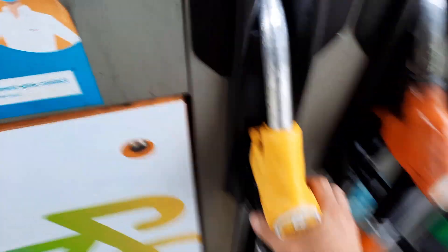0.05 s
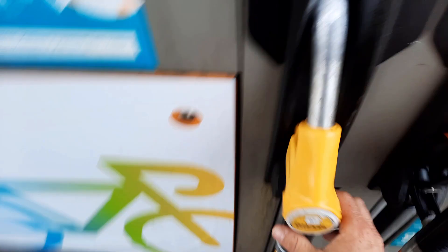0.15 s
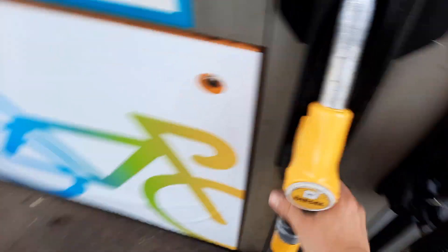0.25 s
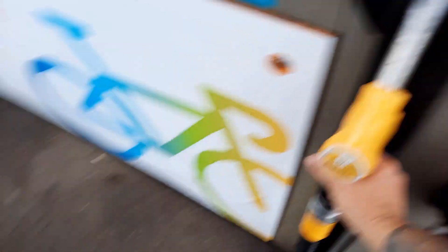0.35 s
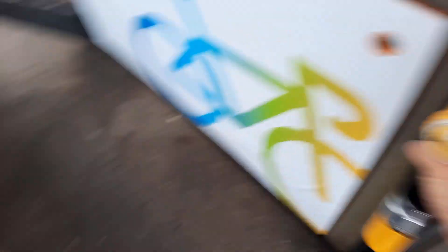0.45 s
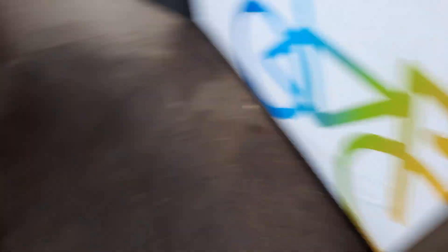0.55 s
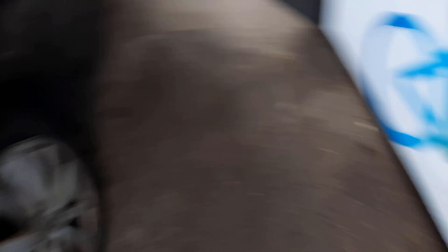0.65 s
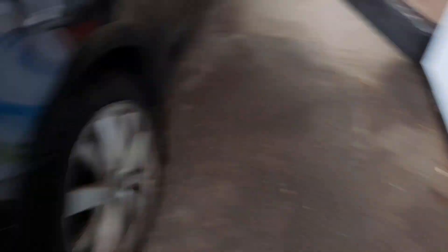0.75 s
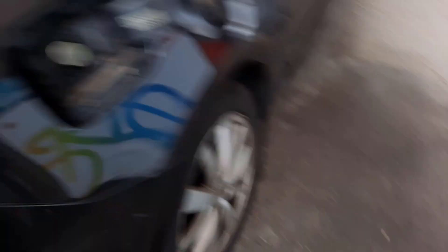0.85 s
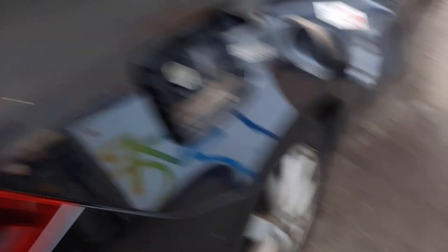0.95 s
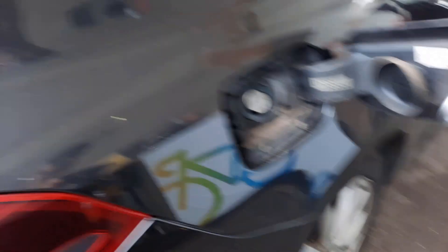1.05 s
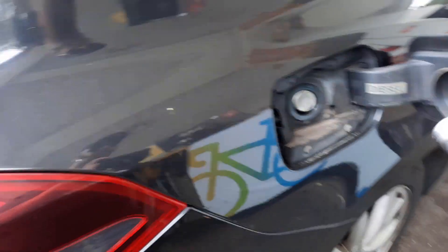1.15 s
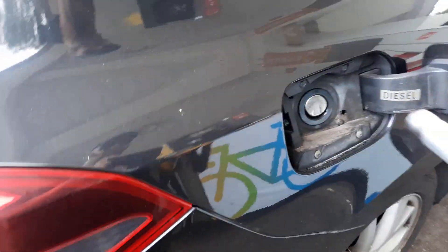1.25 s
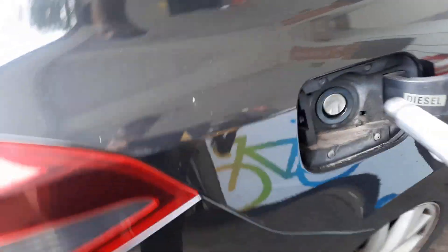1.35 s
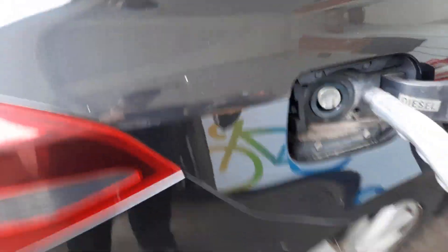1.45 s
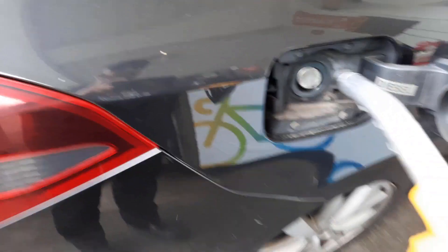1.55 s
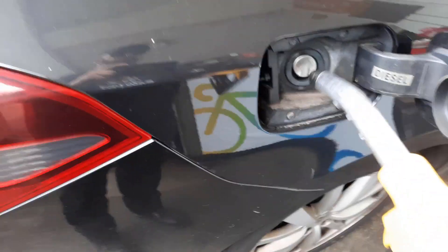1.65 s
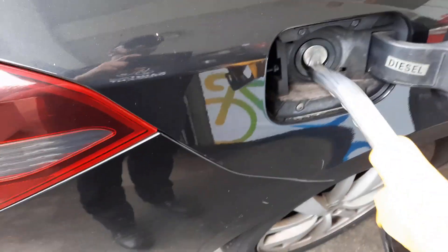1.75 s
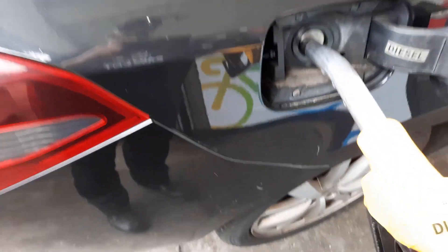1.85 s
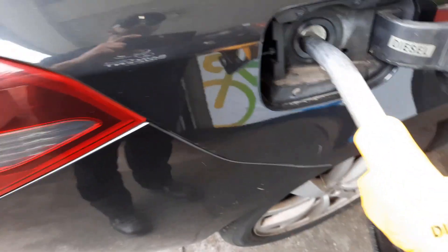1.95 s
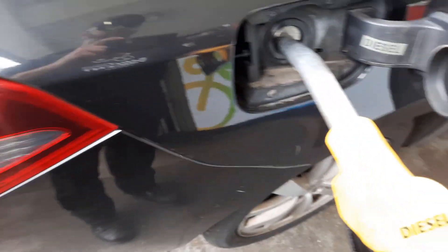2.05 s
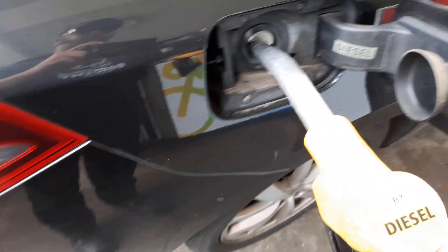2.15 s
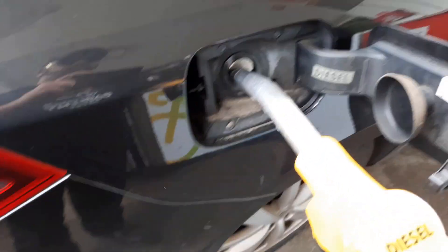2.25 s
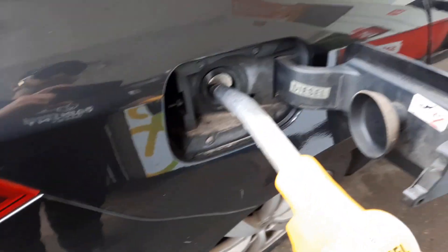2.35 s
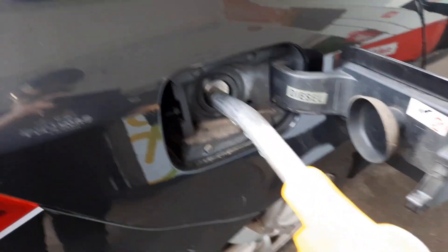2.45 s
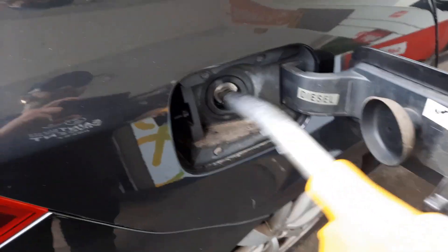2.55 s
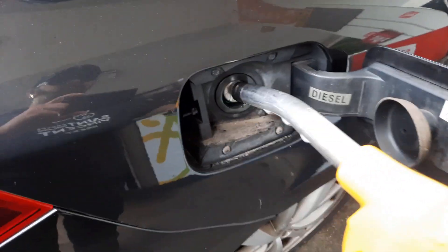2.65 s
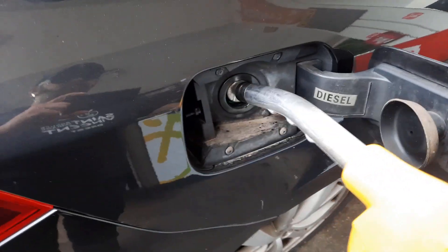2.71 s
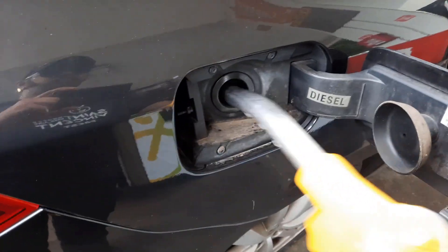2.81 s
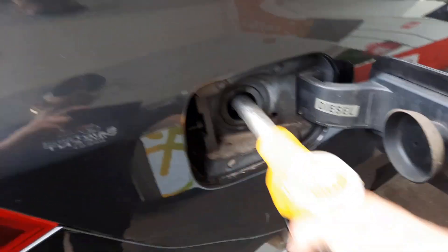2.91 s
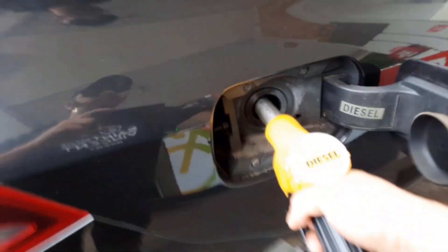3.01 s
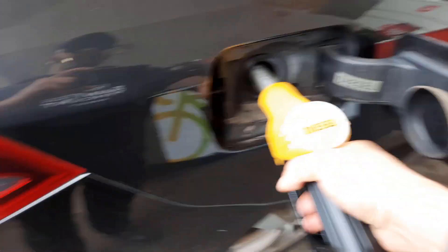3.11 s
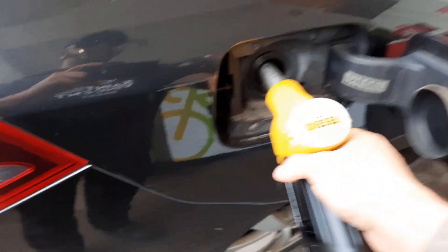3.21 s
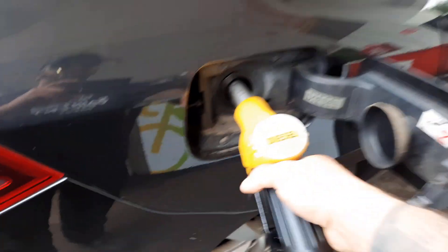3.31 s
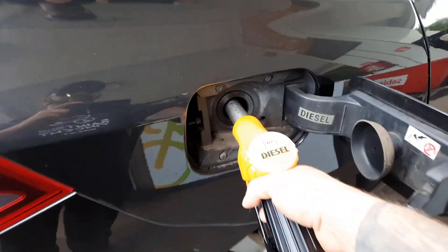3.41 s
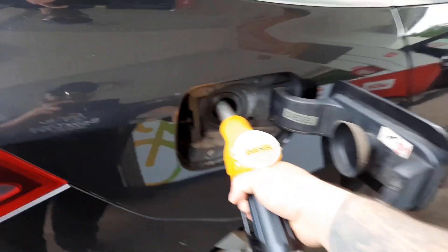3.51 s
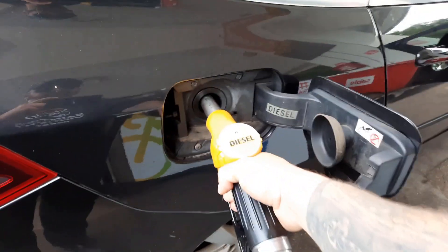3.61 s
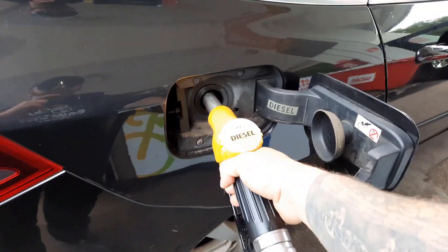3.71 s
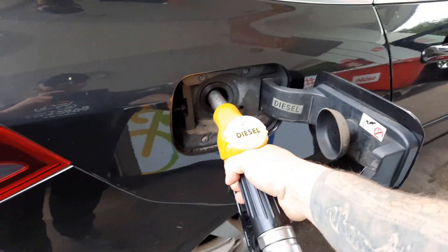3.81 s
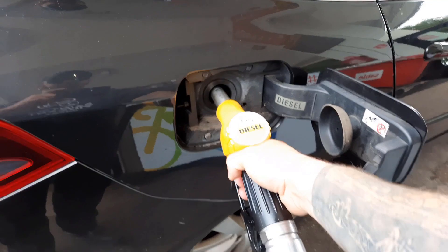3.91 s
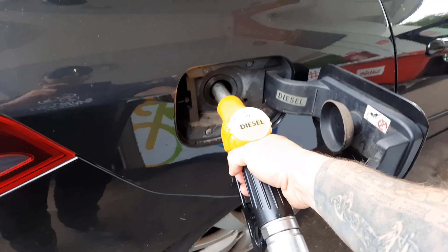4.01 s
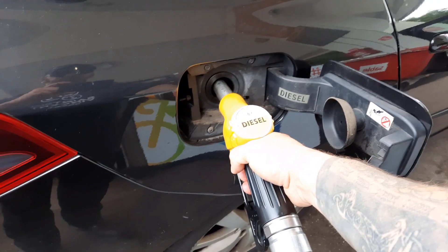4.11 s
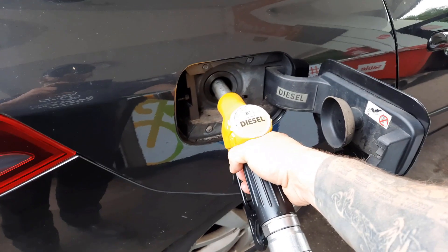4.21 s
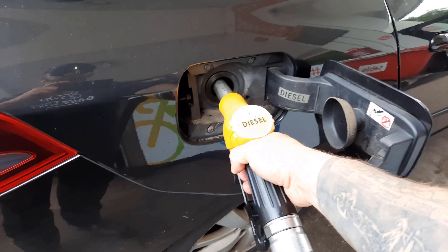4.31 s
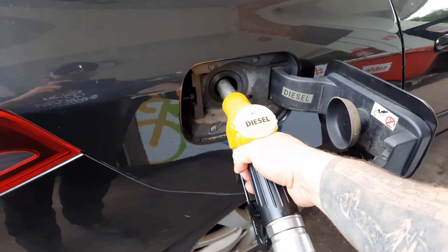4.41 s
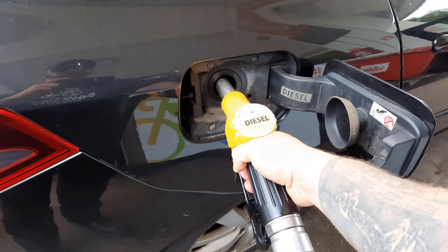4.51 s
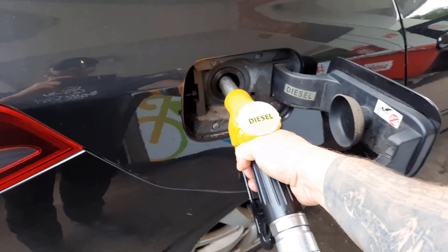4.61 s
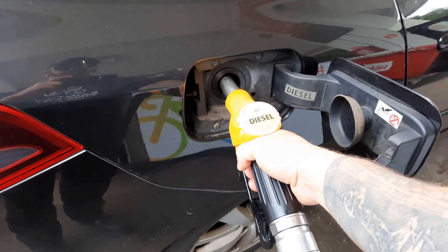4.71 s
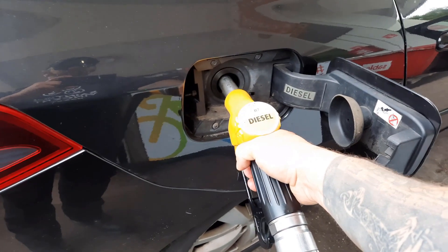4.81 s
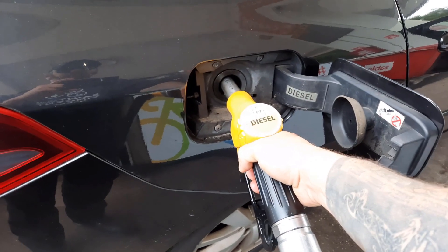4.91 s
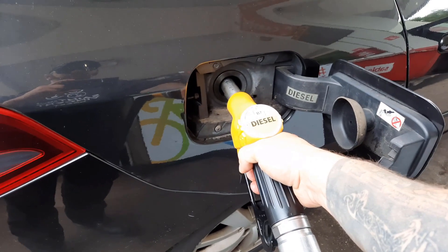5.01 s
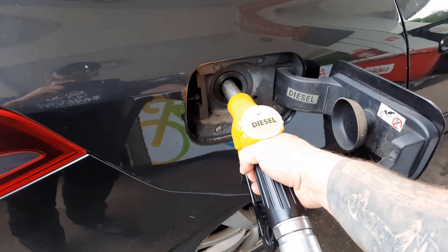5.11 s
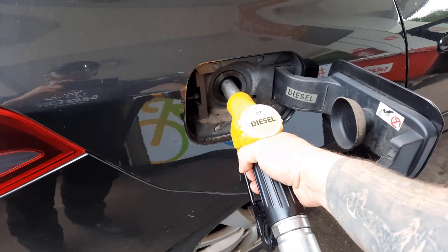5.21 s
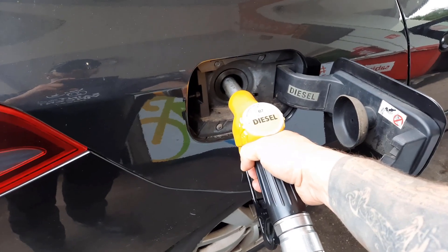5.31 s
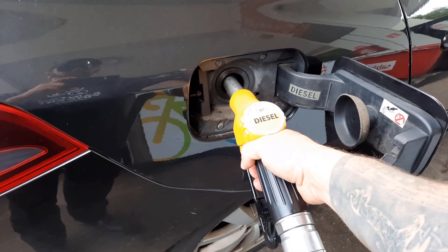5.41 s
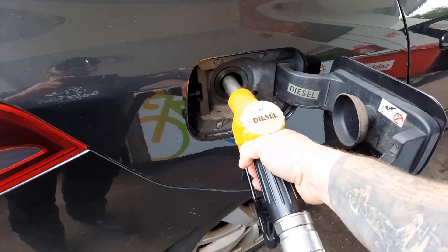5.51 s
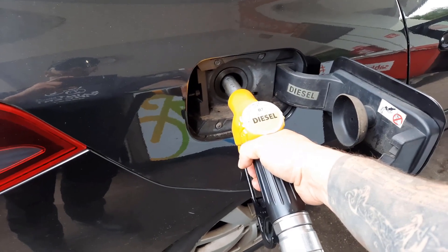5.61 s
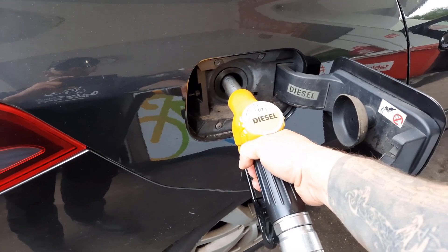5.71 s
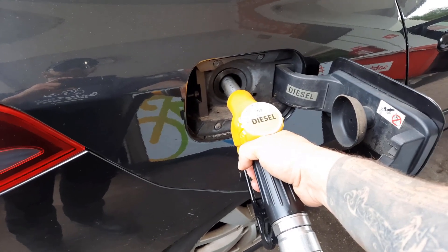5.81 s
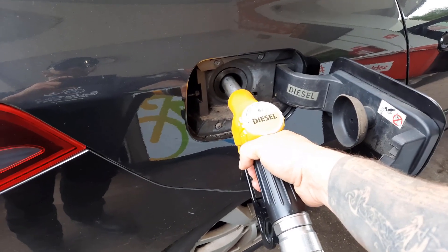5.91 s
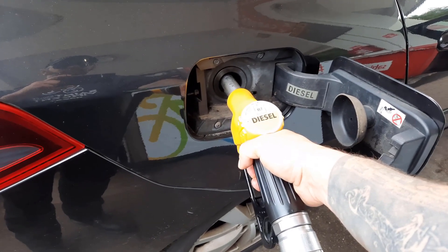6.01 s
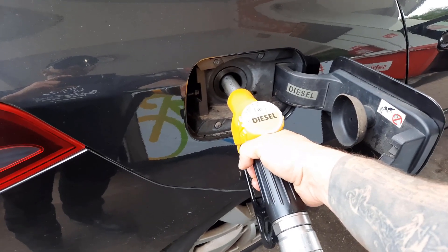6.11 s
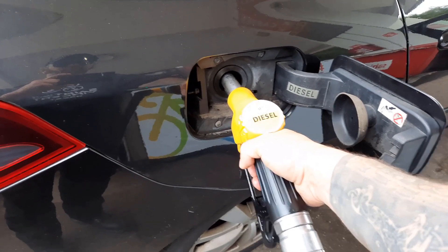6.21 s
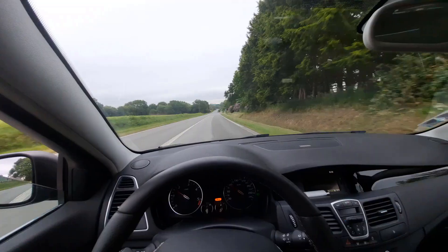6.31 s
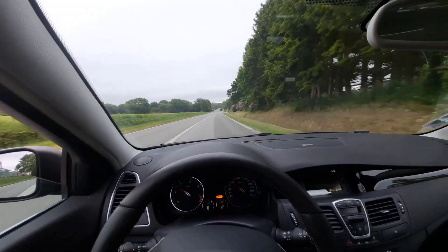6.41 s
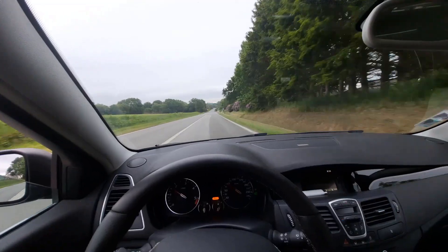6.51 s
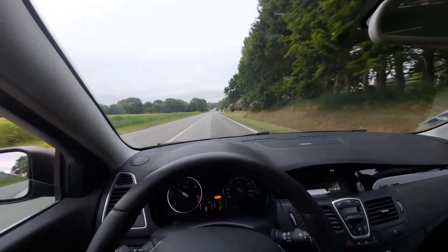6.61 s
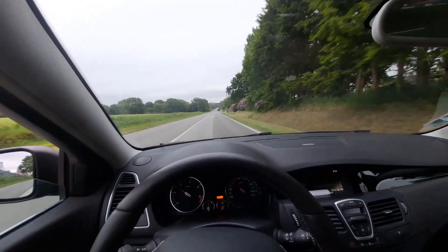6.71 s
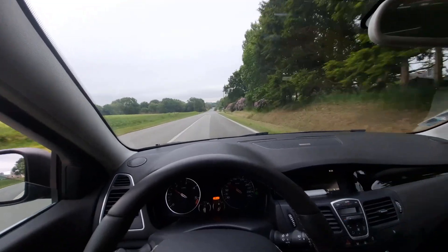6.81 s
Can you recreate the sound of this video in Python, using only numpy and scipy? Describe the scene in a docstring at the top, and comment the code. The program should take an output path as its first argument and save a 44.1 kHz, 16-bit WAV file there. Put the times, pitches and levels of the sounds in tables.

```python
"""Fuel nozzle on a forecourt, then a driving car

A fuel nozzle is knocked out of its holster, scraped into a filler neck and its trigger clicks: blows ring modes.
Fuel swells and gurgles, made of noise and rising bubbles, under a sagging pump whine, a wavering sine.
Birds, gliding sines, sing over the forecourt's noise. After a cut: the noise rumble inside a driving car.
A hand-held camera with two spaced microphones hears it all."""
import sys
import numpy as np
from scipy import signal
from scipy.fft import rfft, irfft, next_fast_len
from scipy.io import wavfile
from scipy.ndimage import uniform_filter1d

SR = 44100
rng = np.random.default_rng(int(sys.argv[2]) if len(sys.argv) > 2 else 0)


def boost_factor(decibels):
    """Convert a level in decibels to a linear amplitude factor."""
    exponent = np.asarray(decibels, float) / 20
    return 10 ** exponent


def generate_wav(sig):
    """Save sig (samples, or channels by samples) to the path in sys.argv[1] as 16-bit PCM at SR."""
    pcm = np.round(np.clip(np.atleast_2d(sig).T, -1, 1) * 32767).astype(np.int16)
    wavfile.write(sys.argv[1], SR, pcm)


N = 302217

# The trigger's click. Each row: start in seconds, tick in dB near 2200 Hz, body in dB,
# lower ring over upper ring in dB, treble in dB near 6000 Hz; all before the gains of blows().
TRIGGER_BLOWS = [(3.9584, -26.5, -41, 48, -17.5)]


def level(x, db):
    """Set the rms."""
    return x * boost_factor(db) / np.sqrt(np.mean(x ** 2))


def curves(table):
    """Columns of a table at every sample, joined by straight lines."""
    s, *columns = np.transpose(table)
    return [np.interp(np.arange(N) / SR, s, c) for c in columns]


def at_hz(hz, points):
    """Read (Hz, value) points on a log axis."""
    f, v = np.transpose(points)
    return np.interp(np.log(np.maximum(hz, 1)), np.log(f), v)


def walk(rate, size):
    """Random levels held 1 / rate s and slewed twice."""
    hold = int(SR / rate)
    steps = np.repeat(rng.standard_normal(size // hold + 1), hold)
    return 0.787 * uniform_filter1d(uniform_filter1d(steps, hold), hold)[:size]


def bumps(times, gains, rise_s, fall_s):
    """Swells that rise exponentially to their moment and die away."""
    late_s = np.arange(N)[None] / SR - np.array(times)[:, None]
    return np.array(gains) @ np.exp(np.where(late_s < 0, late_s / rise_s, -late_s / fall_s))


def wash(points, flicker_db, rate, wide, size=N):
    """Coloured noise whose octaves flicker alone; alike on both sides in the bass, less so in the treble."""
    n = next_fast_len(size)
    hz = np.arange(n // 2 + 1) * SR / n
    mid, side = rfft(rng.standard_normal((2, n))) * boost_factor(at_hz(hz, points))
    side = side * np.clip(wide * np.minimum(hz / 800, 1), 0, 1)
    pair = np.array([mid + side, mid - side])
    out = 0
    for octave in range(5, 15):
        share = np.maximum(1 - np.abs(np.log2(np.clip(hz, 32, 2 ** 14)) - octave), 0)
        band = irfft(pair * share, n)[:, :size]
        out = out + band * boost_factor(flicker_db * walk(rate, size))
    return level(out, 0)


def tone(hz, db, rough_db, rate):
    """A sine that wavers in level and pitch."""
    hz = hz * (1 + .003 * walk(rate, len(hz)))
    sine = np.sqrt(2) * np.sin(2 * np.pi * np.cumsum(hz) / SR)
    return sine * boost_factor(db + rough_db * walk(rate, len(hz)))


def ring(x, hz, t60):
    """One mode, a two-pole resonator; the grip of hand and rubber cuts each ring short, to at most 70 cycles
    plus 0.03 s."""
    t60 = np.clip(t60, .003, 70 / hz + .03)
    r, w = np.exp(-np.log(1000) / (t60 * SR)), 2 * np.pi * hz / SR
    return signal.lfilter([0, r * np.sin(w)], [1, -2 * r * np.cos(w), r * r], x)


def echoes(x, t60, db, top_hz):
    """Scattered, dulled returns from pumps, cars and canopy, different on each side."""
    t = np.arange(SR // 2) / SR
    tail = rng.standard_normal((2, len(t))) * np.exp(-np.log(1000) * t / t60)
    tail = signal.sosfilt(signal.butter(1, top_hz, fs=SR, output="sos"), tail)
    tail = tail / np.sqrt(np.sum(tail ** 2) / 2)
    return x + boost_factor(db) * signal.fftconvolve(x[None], tail, axes=1)[:, :N]


def blows(table, modes, thud_db, contact_s, ring_db, crack_db, crack_s):
    """Each blow: a short rough contact rings the modes, and a crack of noise dies fast, both in the blow's colour."""
    # The five frequencies in Hz at which a blow's colour is set.
    blow_hz = (200, 550, 850, 2200, 6000)
    out = np.zeros(N + SR)
    t = np.arange(SR // 4) / SR
    hz = np.arange(len(t) // 2 + 1) * SR / len(t)
    for s, tick, body_db, lean, treble in table:
        # thud_db lifts the thud near 200 Hz over the body; lean favours the lower or the upper ring
        colour_db = (body_db + thud_db, body_db + min(lean, 0), body_db - max(lean, 0), tick, treble)
        colour = list(zip(blow_hz, colour_db))
        noise = rng.standard_normal((2, len(t)))
        spread = rng.standard_normal((2, len(modes)))
        push = (1 + .5 * noise[0]) * np.exp(-t / contact_s) + 0.058 * noise[0] * np.exp(-t / 0.0072)
        push = level(push, 0) / np.sqrt(len(t))
        body = 0
        for (f, g, t60), detune, uneven in zip(modes, *spread):
            r = ring(push, f * (1 + 0.018 * detune), t60)
            # a longer push feeds low modes more, so each is scaled to its own peak
            body = body + boost_factor(g + 0.5 * uneven + at_hz(f, colour)) * r / np.abs(r).max()
        tilt = np.sqrt(1000 / np.maximum(hz, 300)) / (1 + (hz / 13000) ** 4) * np.minimum(hz / 250, 1) ** 2
        crack = irfft(rfft(noise[1]) * boost_factor(at_hz(hz, colour)) * tilt, len(t))
        crack = crack * (np.exp(-t / crack_s) + .1 * np.exp(-t / .012))
        i = int(s * SR)
        out[i:i + len(t)] += boost_factor(ring_db) * body + boost_factor(crack_db) * crack
    # small parts radiate no deep bass
    return signal.sosfilt(signal.butter(3, 90, "high", fs=SR, output="sos"), out[:N])


def late(lag_s):
    """Phase line of a left side that hears later."""
    return [(0, 0), (SR / 2, -np.pi * SR * lag_s)]


def heard(x, lead, balance):
    """The two microphones: own colour each, and a phase step between them."""
    n = next_fast_len(N)
    hz = np.arange(n // 2 + 1) * SR / n
    half_db = at_hz(hz, balance) / 2
    phase = np.interp(hz, *np.transpose(lead))
    ports = np.array([boost_factor(half_db) * np.exp(1j * phase), boost_factor(-half_db)])
    return irfft(rfft(x * np.ones((2, 1)), n) * ports, n)[:, :N]


def microphone_hiss():
    """Steady treble-heavy noise of the microphones."""
    # Each row: frequency in Hz, relative level in dB per Hz.
    hiss_colour = [(3000, -15), (8000, 6), (16000, -2)]
    return boost_factor(-87) * wash(hiss_colour, 1.5, 20, 1)


def forecourt():
    """Distant traffic: a wide noise bed that slowly swells and sinks."""
    # Each row: frequency in Hz, relative level in dB per Hz.
    town_colour = [(18, -54), (30, -35), (86, -10), (194, -13), (311, 2), (437, -10), (499, -9),
                   (616, -17.5), (666, -15), (1910, -22.5), (2290, -17), (2900, -47), (5040, -34.5),
                   (8980, -54), (16000, -79)]
    # Each row: time in seconds, level in dB.
    traffic = [(0, -41.5), (.9, -45), (1.3, -46.5), (1.75, -45.5), (2.1, -42.5), (2.6, -40), (3.3, -42),
               (3.8, -41), (4.5, -42)]
    return wash(town_colour, 3, 21, .95) * boost_factor(curves(traffic)[0])


def cabin():
    """Body boom and tyre roar inside the car, noise below and above 300 Hz, each on its own swell."""
    # Each row: frequency in Hz, relative level in dB per Hz.
    cabin_colour = [(12, -46), (20, -22), (43, -2), (127, -4), (187, -9), (228, -15.5), (328, -10),
                    (527, -18), (849, -17.5), (949, -20.5), (1400, -26), (2260, -28), (2750, -37.5),
                    (8410, -46.5), (16000, -55)]
    # Each row: time in seconds, body boom in dB, tyre roar in dB.
    road = [(6.32, -18, -27), (6.38, -16, -26), (6.6, -16, -27), (6.72, -17, -27.5), (6.85, -21, -27)]
    start = int(6.318 * SR)
    noise = np.pad(wash(cabin_colour, 2.2, 19.7, 0.7, size=N - start), ((0, 0), (start, 0)))
    boom = signal.sosfilt(signal.butter(2, 300, fs=SR, output="sos"), noise)
    boom_db, roar_db = curves(road)
    # the silence ahead of the cabin must not count in the rms
    silence_gain = np.sqrt(N / (N - start))
    return (level(boom, 0) * boost_factor(boom_db) + level(noise - boom, 0) * boost_factor(roar_db)) / silence_gain


def birds():
    """Whistled notes, sines bending through three pitches, with echoes."""
    # Held whistles. Each row: start in seconds, length in seconds, middle pitch in Hz, dry level in dB,
    # bend in Hz from start to end.
    whistles = [(1.007, 0.43, 7300, -68, 268), (1.493, 0.13, 4580, -69, -50),
                (3.163, .071, 6020, -60.5, 150), (3.241, 0.11, 6100, -70, -67),
                (3.437, 0.05, 4930, -52, -90), (3.508, 0.097, 2436, -58, -120),
                (4.205, 0.064, 4700, -58.5, -10), (4.285, .085, 4690, -61, -13), (4.399, .03, 4680, -62, 0),
                (4.465, 0.066, 4690, -67, 0), (4.463, 0.083, 3450, -69, -100),
                (5.082, .066, 3470, -64, -82), (5.258, 0.15, 7440, -48.5, 264),
                (5.567, 0.026, 4250, -52.5, 83.5)]
    # Shapes of quick notes, each one row: length in seconds, start, middle and end pitch in Hz.
    # Their plurals list when each is sung. Each row: start in seconds, dry level in dB.
    swoop = (.013, 5550, 6300, 7500)
    swoops = [(3.51, -58), (3.733, -55)]
    arch = (.09, 7420, 7580, 6650)
    arches = [(3.518, -56.5), (3.748, -57.5), (3.972, -55)]
    hook = (0.043, 6630, 7040, 5400)
    hooks = [(4.484, -51)]
    scoop = (.066, 5990, 5840, 6140)
    scoops = [(5.755, -42)]
    slur = (.028, 8170, 7650, 7420)
    slurs = [(5.9, -47), (6.05, -48), (6.196, -54)]
    dive = (.038, 6250, 4800, 3900)
    dives = [(3.644, -51.5), (3.872, -53), (4.095, -51)]
    chip = (.015, 5100, 5620, 5980)
    chips = [(4.682, -48), (4.83, -42), (4.986, -42.5), (5.14, -41.5)]
    pip = (.007, 7450, 7900, 8170)
    pips = [(5.876, -52), (6.026, -51), (6.172, -58)]
    drop_note = (.013, 6150, 5850, 5400)
    drop_notes = [(5.553, -51), (5.962, -42), (6.106, -44), (6.263, -47)]
    shapes = (swoop, arch, hook, scoop, slur, dive, chip, pip, drop_note)
    songs = (swoops, arches, hooks, scoops, slurs, dives, chips, pips, drop_notes)

    notes = [(s, db, length, hz - bend / 2, hz, hz + bend / 2) for s, length, hz, db, bend in whistles]
    for shape, sung in zip(shapes, songs):
        notes += [(*row, *shape) for row in sung]
    out = np.zeros(N)
    for s, db, length, *pitches in notes:
        u = np.linspace(0, 1, int(length * SR))
        hz = np.polyval(np.polyfit([0, .5, 1], pitches, 2), u)
        # a note is loudest at its top: 16 dB per octave
        song_db = db + 16 * np.log2(hz / hz.max())
        i = int(s * SR)
        out[i:i + len(u)] += tone(hz, song_db, 3.5, 60) * np.sin(np.pi * u) ** .3
    return echoes(out, .6, -6, 9000)


def pump_whine():
    """The pump's whine, one wavering sine whose pitch sags."""
    # Each row: time in seconds, pitch in Hz, level in dB.
    whine = [(3.2, 2303, -62), (3.47, 2300, -54.5), (3.55, 2280, -91), (4.25, 2265, -74), (4.4, 2255, -58),
             (5.0, 2215, -51.5), (5.2, 2190, -45.5), (5.4, 2160, -50.5), (5.85, 2150, -53),
             (5.95, 2140, -44), (6.28, 2070, -55)]
    return tone(*curves(whine), 2.6, 35)


def hose_squeak():
    """The hose squeaks thinly as it swings, a wandering high sine."""
    # Each row: time in seconds, pitch in Hz, level in dB.
    squeaks = [(1.5, 13000, -76), (1.53, 13600, -72), (1.555, 13300, -78), (1.59, 12900, -76),
               (1.64, 15200, -70), (1.69, 13800, -69), (1.74, 14300, -69), (1.77, 13900, -76)]
    t = np.arange(N) / SR
    return tone(*curves(squeaks), 3.9, 40.8) * (t > squeaks[0][0]) * (t < squeaks[-1][0])


def hose_and_sleeve():
    """Hose rumble through the hand and a rustle of sleeve and hose, two noises that follow the motion."""
    # Nozzle and hose in motion. Each row: time in seconds, hose rumble in dB, rustle in dB.
    motion = [(0, -51, -45.5), (.15, -44, -52), (.6, -49, -51), (.72, -41, -75), (.83, -45, -89),
              (1.05, -41, -56), (1.18, -48, -61), (1.4, -58, -59.5), (1.76, -68, -61), (2.0, -45.5, -61),
              (2.25, -74, -66), (2.5, -66, -58), (2.7, -64, -60), (3.1, -33, -75), (3.25, -58, -65),
              (3.4, -59, -80)]
    # The hose jolts. Each row: peak in seconds, level in dB.
    jolts = [(.188, -34), (.494, -31), (.65, -35.5), (.98, -37), (1.044, -58.5), (1.79, -36), (2.6, -68),
             (2.8, -34), (3.012, -55)]
    # A sleeve or hand brushes. Each row: peak in seconds, level in dB.
    brushes = [(.82, -46), (2.51, -57), (3.25, -54), (4.63, -60), (4.8, -60)]
    # Colours of the two noises. Each row: frequency in Hz, relative level in dB per Hz.
    rumble_colour = [(20, -30), (40, -8), (60, -3.5), (90, 5.5), (130, -4.5), (300, -59)]
    rustle_colour = [(1470, 8), (2500, -8), (3410, 1.5), (5610, -8), (6810, -9), (7770, -0.5), (8800, -9),
                     (16000, -6)]
    rumble_db, rustle_db = curves(motion)
    # the motion fades out over the last 0.15 s
    moving = np.clip((motion[-1][0] - np.arange(N) / SR) / .15, 0, 1)
    s, db = np.transpose(jolts)
    rumble = moving * (boost_factor(rumble_db) + bumps(s, boost_factor(db), 0.019, 0.046))
    s, db = np.transpose(brushes)
    rustle = moving * boost_factor(rustle_db) + bumps(s, boost_factor(db), 0.031, 0.044)
    return wash(rumble_colour, 0.88, 25, 1.0) * rumble + wash(rustle_colour, 0.91, 40.9, 0.77) * rustle


def scraping():
    """Grit that drums the bodywork: rough bright noise and a dull drumming under the same strokes."""
    # Shudders after a blow. Each row: start in seconds, length in seconds, grit in dB, bodywork in dB.
    shudders = [(0.094, 0.052, -22, -27), (0.181, .18, -29.5, -19), (0.382, 0.18, -40, -26.5),
                (0.487, 0.17, -29, -30), (0.687, 0.054, -35.5, -29), (0.73, 0.11, -32, -30.5),
                (1.083, 0.27, -46.5, -40), (1.792, .09, -30, -17), (1.87, 0.18, -39.5, -31),
                (2.625, 0.06, -38, -20), (2.778, 0.082, -55, -22.5), (2.82, 0.24, -30, -19),
                (3.008, 0.061, -20.5, -8), (3.068, 0.41, -43, -39)]
    # Each row: start in seconds, length in seconds, grit in dB, bodywork in dB, swell in dB to the end.
    scrapes = [(0.067, 0.037, -30.5, -33, -15), (.447, 0.036, -53, -24, -0.5),
               (0.587, 0.042, -41.5, -52, 8), (.631, 0.053, -31.5, -33, 2.5), (.86, 0.078, -41, -52, -4.5),
               (2.441, 0.26, -55.5, -62, 14), (2.897, .034, -29, -23, 8), (2.936, 0.0696, -21, -21, -3.5)]
    # Colours of grit and bodywork. Each row: frequency in Hz, relative level in dB per Hz.
    grit_colour = [(290, -7), (500, 6), (578, 3.5), (974, -4.5), (2010, -5.5), (2980, -19.5), (5470, -26.5),
                   (8450, -23.5), (9920, -33), (16000, -35)]
    drum_colour = [(50, -41), (100, -10.5), (140, 3.5), (250, 0), (400, -2.5), (600, -49), (1200, -84)]
    # over a shudder the grit fades by 20.5 dB and the bodywork by 24 dB
    strokes = [(*row, -20.5, -24) for row in shudders] + [(*row, row[-1]) for row in scrapes]
    press = np.zeros((2, N))
    for s, length, *db in strokes:
        i, k = int(s * SR), int(length * SR)
        start_db, change_db = db[:2], db[2:]
        press[:, i:i + k] += boost_factor(np.linspace(start_db, np.add(start_db, change_db), k).T)
    grit_press, drum_press = uniform_filter1d(press, size=150)
    grit = level(wash(grit_colour, 2, 50, .7) * boost_factor(3.5 * walk(220, N)), 0)
    return grit * grit_press + wash(drum_colour, 3.0, 29.8, 0.089) * drum_press


def fuel():
    """The rush and spray in the pipe, and bubbles that glide up as displaced air escapes."""
    # Each row: time in seconds, fuel flow in dB before the gains of rush and gurgle, spray in dB.
    flow = [(3.8, -52, -64), (4.18, -49, -62), (4.58, -46, -67), (4.61, -43, -46.5), (4.74, -43.5, -53),
            (5.45, -42, -56), (5.81, -37.5, -51.5), (5.83, -37, -47), (6.18, -36.5, -44),
            (6.275, -35, -40.5)]
    # Large gulps of air. Each row: peak in seconds, level in dB before the gurgle's gain, pitch in Hz.
    glugs = [(3.96, -22, 314), (4.07, -44, 306), (4.2, -33, 319), (4.61, -32, 358), (4.776, -42, 300),
             (4.93, -27.5, 357), (4.99, -21.5, 360), (5.08, -30, 359), (5.524, -31.5, 284),
             (5.73, -37, 324), (5.92, -26.5, 249), (5.996, -26, 300)]
    # Colours of rush and spray. Each row: frequency in Hz, relative level in dB per Hz.
    rush_colour = [(18, -52), (30, -22), (59, -12.5), (86, -1), (307, -1), (428, -4), (481, -2), (815, -7),
                   (1090, -6), (1520, -18.5), (2160, -13.5), (2680, -32.5), (3200, -40), (4160, -100),
                   (7040, -120)]
    spray_colour = [(1530, -1), (2600, -7), (3370, -4), (5820, -0.5), (6780, -18), (7710, -5), (9190, -19),
                    (12700, -23), (16000, -22)]
    glug_rise_s, glug_fall_s = 0.034, 0.048
    flow_db, spray_db = curves(flow)
    s, db, glug_hz = np.transpose(glugs)
    steady = boost_factor(flow_db + 1.5)
    gulps = bumps(s, boost_factor(db), glug_rise_s, glug_fall_s)
    # bubble pitch: 313.6 Hz in the steady flow, drawn towards each gulp's own pitch
    gulp_pull = bumps(s, boost_factor(db) * glug_hz, glug_rise_s, glug_fall_s)
    gurgle_hz = (steady * 313.6 + gulp_pull) / (steady + gulps)
    gurgle = np.zeros(N + SR)
    t = np.arange(SR // 20) / SR
    for when, pitch, size in rng.random((900, 3)):
        i = int(when * N)
        hz = gurgle_hz[i] * 1.8 ** (pitch - .5)
        glide = np.sin(2 * np.pi * hz * t * (1 + 1.54 * t))
        gurgle[i:i + len(t)] += boost_factor(9.7 * size) * np.minimum(t * hz, 1) * glide * np.exp(-t * hz / 5)
    rush = wash(rush_colour, 2.6, 20, 0.6) * boost_factor(flow_db + 9.5)
    bubbles = level(gurgle[:N], -3.0) * (steady + gulps)
    spray = wash(spray_colour, 2, 26, .94) * boost_factor(spray_db)
    opened = np.clip((np.arange(N) / SR - flow[0][0]) / 0.64, 0, 1)
    return opened * (rush + bubbles + spray)


def trigger_spring():
    """The trigger spring rattles on thinly after the click, a dying treble noise."""
    # Each row: frequency in Hz, relative level in dB per Hz.
    spring_colour = [(7000, -30), (10500, -14), (12200, 6), (14000, -8), (16000, -14)]
    return wash(spring_colour, 3, 60, .8) * bumps([TRIGGER_BLOWS[0][0]], [boost_factor(-47)], .0005, .048)


def trigger():
    """The trigger's click rings its small metal parts."""
    # Each row: mode in Hz, level in dB, t60 in seconds before the limit of the grip.
    trigger_modes = [(310, -2, .12), (2218, -8, .06), (5150, -3, .012), (5600, 0, .014), (6100, -3, .012),
                     (5523, -14, .045), (6000, -17, .045), (9033, -20, .03), (11600, -20, .04),
                     (12200, -16, .04), (12800, -21, .04)]
    return blows(TRIGGER_BLOWS, trigger_modes, 20.5, .0001, 1.7, 11.6, 0.0024)


def spout():
    """The loose spout clanks and chatters against metal, each tap a brief rough contact that rings it."""
    # The metal spout. Each row: mode in Hz, level in dB, t60 in seconds.
    spout_modes = [(1136, -1.5, 0.04), (1380, -8.5, .04), (1960, -18, .03)]
    # Each row: tap in seconds, relative level in dB.
    spout_taps = [(.728, -11.5), (.744, -22.5), (.79, -30.5), (.889, -31.5), (1.787, -31), (1.818, -30),
                  (1.84, -26), (1.858, -31), (1.868, -26), (1.887, -29)]
    s, db = np.transpose(spout_taps)
    taps = .15 * (1 + .5 * rng.standard_normal(N)) * bumps(s, boost_factor(db), .0001, .0002)
    return sum(boost_factor(g) * ring(taps, hz, t60) for hz, g, t60 in spout_modes)


def filler_neck():
    """The nozzle's blows on the filler neck ring its modes."""
    # Each row: start in seconds, tick in dB near 2200 Hz, body in dB, lower ring over upper ring in dB,
    # treble in dB near 6000 Hz; all before the gains of blows().
    neck_blows = [(1.7862, -17.5, -15.5, -33, -21.5), (1.8029, -45, -14, -42, -24.5),
                  (1.8661, -34, -20, -51, -41), (1.8903, -32, -27, -18, -41),
                  (2.2722, -29.5, -50, -16, -24.5), (2.4123, -34, -43, -7, -27),
                  (2.6244, -14.5, -14.5, 4, -23.5), (2.7811, -27, -25.5, 0, -65),
                  (2.824, -10, -13.5, -7, -23.5), (2.91, -26, -22, -2, -30), (2.9309, -15, -19, -11, -31),
                  (2.948, -23, -9, -27, -26), (2.966, -15, -24, -24, -49), (3.0068, -2, -9.5, 8, -13),
                  (3.1638, -36, -57, 9, -43), (3.2164, -27.5, -55, 11, -54)]
    # Each row: mode in Hz, level in dB, t60 in seconds before the limit of the grip.
    neck_modes = [(108, 2, .25), (141.7, -11, 0.51), (177.8, -3, 0.29), (265.3, -3.5, 0.15),
                  (378, 4.5, 0.036), (669, -17, 0.15), (1153, -14, 0.043), (2160, 0, 0.025)]
    return blows(neck_blows, neck_modes, -5.5, 0.00023, 0.69, 8.65, 0.003)


def holster():
    """The nozzle knocks in its holster: the blows ring its modes, and the forecourt echoes."""
    # Each row: start in seconds, tick in dB near 2200 Hz, body in dB, lower ring over upper ring in dB,
    # treble in dB near 6000 Hz; all before the gains of blows().
    holster_blows = [(0.0666, -16, -24.5, -4, -34), (0.095, -19, -10.5, 4.5, -20),
                     (0.1834, -4.5, -4, -20, -17.5), (0.2074, -3.5, -19, -0.5, -20),
                     (0.3646, -8.5, -6.5, 5, -19), (0.4495, -7, -6, -16, -13),
                     (0.4938, -13.5, -24, -6, -32), (0.512, -31, -19.5, -5.5, -36),
                     (0.557, -14, -35, 12, -73), (0.6228, -16, -46, 13, -35), (0.6395, -10, -21.5, -3, -35),
                     (0.7259, -12.5, -14.5, -37, -72), (0.8614, -35, -42, -1, -69),
                     (0.8824, -22, -31.5, -12, -82), (1.0779, -35, -32, -22.5, -74.5)]
    # Each row: mode in Hz, level in dB, t60 in seconds before the limit of the grip.
    holster_modes = [(109.6, -10.5, 0.85), (175.4, -7, 0.21), (315, -13, 0.33), (550, -21, 0.059),
                     (551.5, -1, 0.07), (838, 0, 0.035), (1184, -11.5, 0.065), (2300, -11, 0.028)]
    knocks = blows(holster_blows, holster_modes, -17.5, 0.000093, 2.1, 7.46, 0.0024)
    return echoes(knocks, 0.092, -7.5, 5900)


def scene():
    """Forecourt up to the cut, cabin after it; the pump stands to the right, the neck almost ahead."""
    # Balance of the microphones. Each row: frequency in Hz, left minus right in dB.
    outdoor_balance = [(60, 0.5), (110, 0.5), (200, 1.0), (380, 1.5), (700, 4.5), (1290, 2.5), (2380, 12.5),
                       (4400, 5.5), (8120, 2.0), (15000, -1.5)]
    near_balance = [(60, 0.0), (110, 0.0), (200, 0.5), (380, 1.0), (700, 3.0), (1290, 3.0), (2380, 6.5),
                    (4400, 0.0), (8120, -1.5), (15000, 0.0)]
    cabin_balance = [(60, 2.0), (110, 1.5), (200, 2.5), (380, 1.5), (700, 4.0), (1290, 3.0), (2380, -1.0),
                     (4400, 2.0), (8120, 4.5), (15000, 2.0)]
    # Each row: frequency in Hz, phase in radians by which the left leads.
    holster_lead = [(0, 0), (950, -1.6), (1460, -3.1), (2580, -9.6), (3700, -10.4), (5080, -15.7),
                    (7060, -29.0), (10100, -37.4), (16100, -77.6)]
    # seconds by which the left hears behind the right
    far_lag_s, near_lag_s, cabin_lag_s = 0.000491, 0.0001676, -0.000372
    cut_s = 6.286

    far = microphone_hiss() + forecourt() + birds() + pump_whine() + fuel()
    near = echoes(filler_neck() + trigger() + spout(), 0.17, -15, 11000)
    near = near + hose_and_sleeve() + scraping() + hose_squeak() + trigger_spring()
    outdoors = heard(far, late(far_lag_s), outdoor_balance)
    outdoors = outdoors + heard(near, late(near_lag_s), near_balance)
    outdoors = outdoors + heard(holster(), holster_lead, near_balance)
    before_cut = np.clip((cut_s - np.arange(N) / SR) / 0.0011, 0, 1)
    return outdoors * before_cut + heard(cabin(), late(cabin_lag_s), cabin_balance)


def top_cut(x):
    """Nothing passes above the cut-off."""
    return signal.sosfilt(signal.butter(12, 16520, fs=SR, output="sos"), x)


def record(dry):
    """The microphones lose the deepest bass and the camera rounds its loudest peaks."""
    thin = signal.sosfilt(signal.butter(2, 40, "high", fs=SR, output="sos"), dry)
    return top_cut(np.tanh(thin))


dry = scene()
out = record(dry)
generate_wav(out)
```